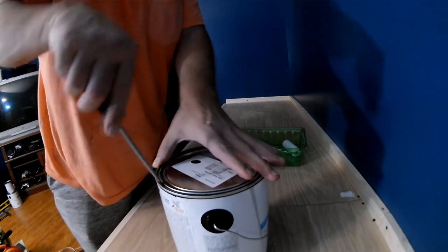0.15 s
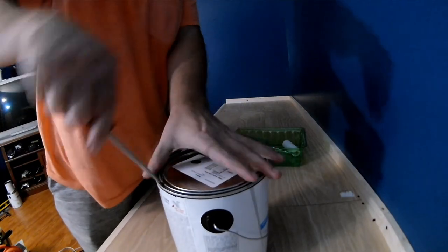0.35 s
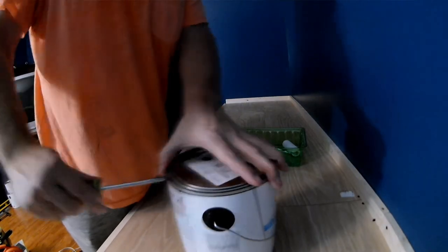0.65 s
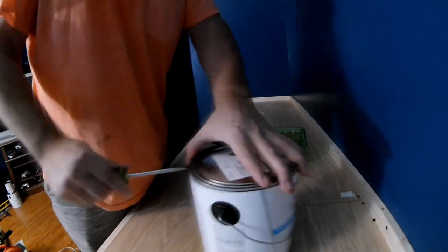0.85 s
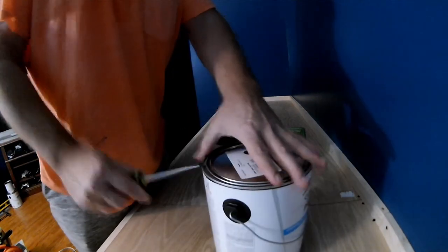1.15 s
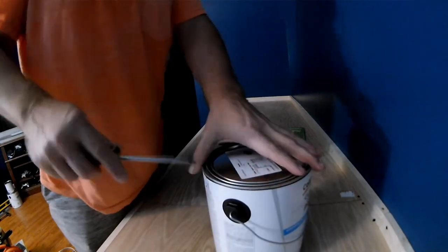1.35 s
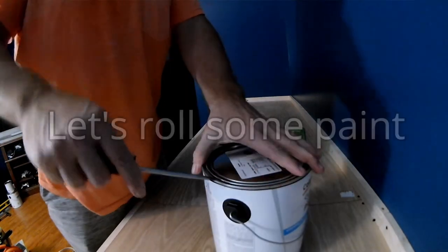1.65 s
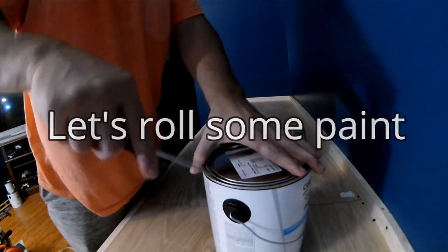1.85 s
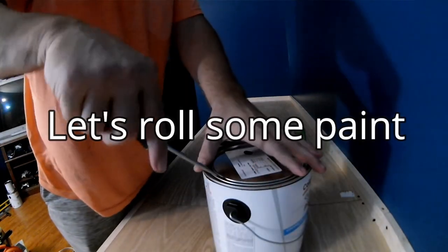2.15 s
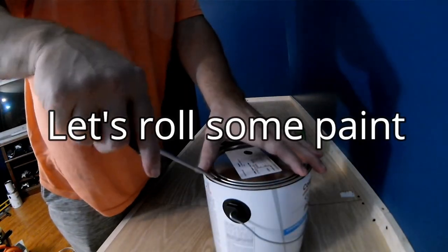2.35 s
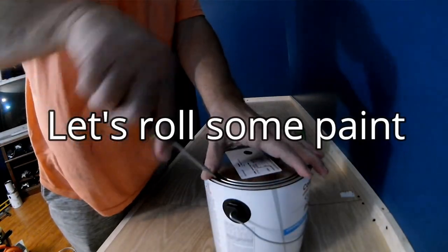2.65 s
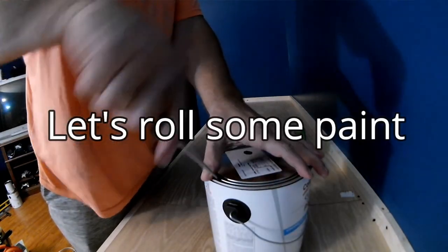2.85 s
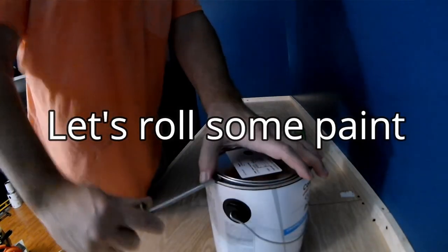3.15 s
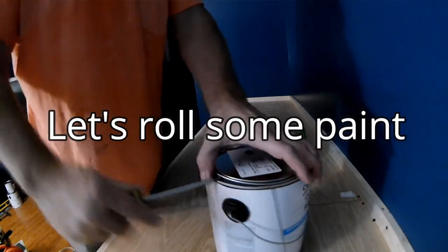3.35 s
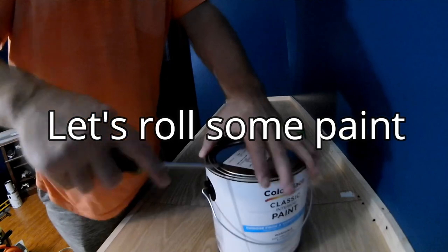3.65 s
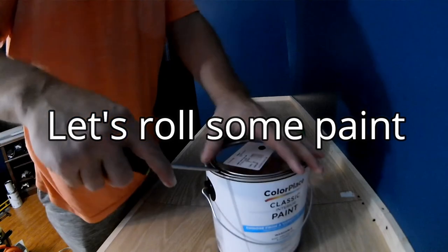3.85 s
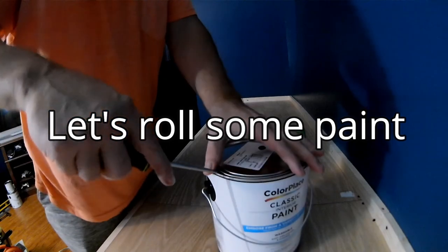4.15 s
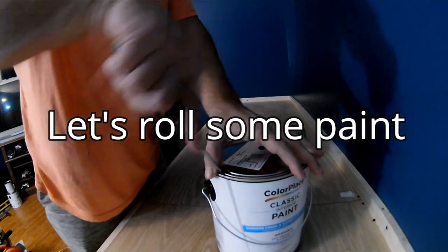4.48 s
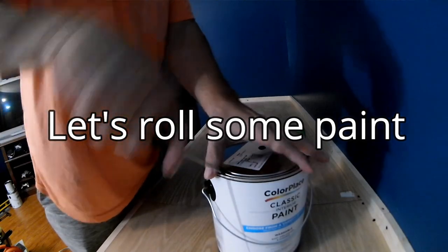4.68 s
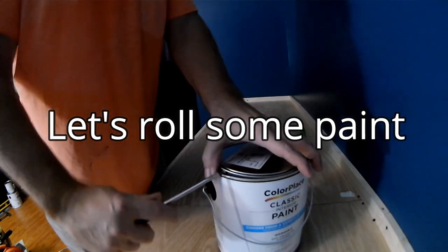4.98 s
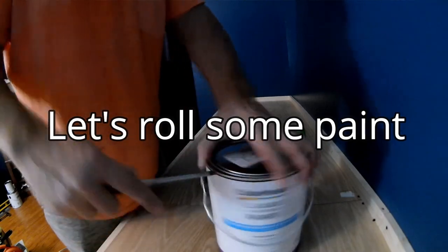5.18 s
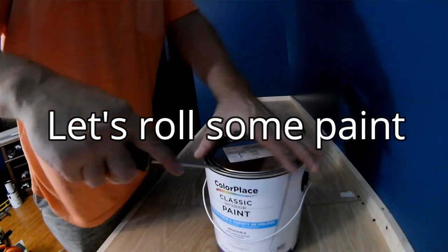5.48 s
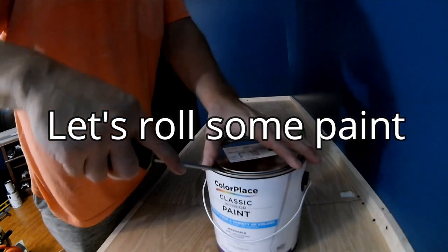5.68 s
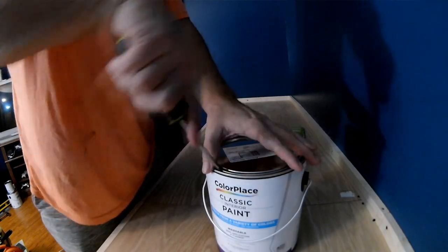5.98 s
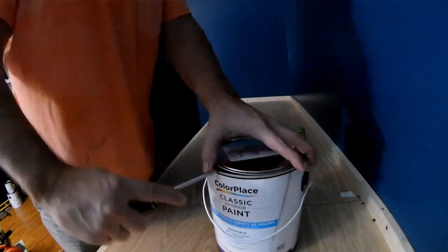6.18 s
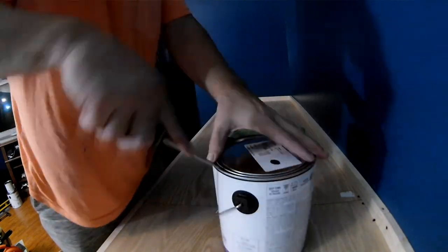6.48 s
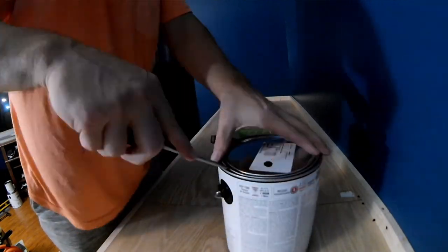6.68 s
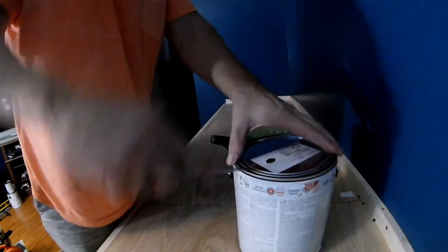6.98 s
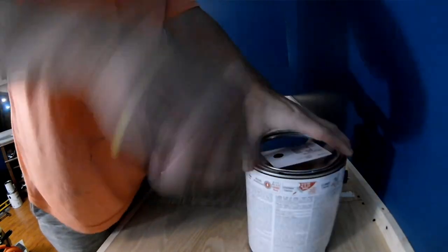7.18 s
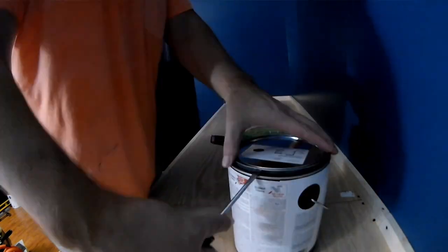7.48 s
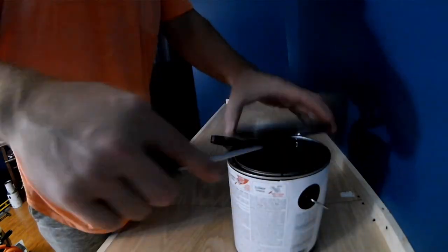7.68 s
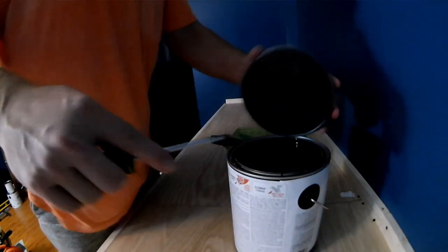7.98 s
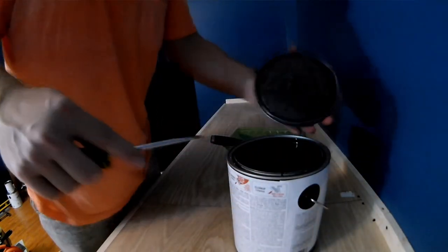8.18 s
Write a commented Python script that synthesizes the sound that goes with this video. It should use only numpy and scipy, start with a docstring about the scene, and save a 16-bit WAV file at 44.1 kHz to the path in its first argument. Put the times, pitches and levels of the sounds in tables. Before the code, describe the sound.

Uneven metallic cracks and hollow clanks on a full steel can, short scraping turns, a burst of fast high ticking over hiss, then room tone.

```python
"""A full steel paint can on a wooden bench in a small, live room has its lid levered up by a screwdriver.
Each knock of the blade is a crack, a rattle of steel and ringing modes; lid snaps add the lid's own ring.
Between tries the can is slid round, made of tiny filtered slips, and it rocks on its base with low swells.
The last tries pass in fast motion, eight times as quick and as high: a chatter of bright ticks over hiss.
A noise-built room tone lies under it all, and is left alone once the fast stretch ends."""
import sys
import numpy as np
from scipy import signal
from scipy.fft import rfft, irfft, next_fast_len
from scipy.io import wavfile
from scipy.ndimage import uniform_filter1d

SR = 44100
rng = np.random.default_rng(int(sys.argv[2]) if len(sys.argv) > 2 else 0)


def unload_wav(signal):
    """Save mono or channel-first audio to the path in sys.argv[1] as 16-bit WAV at rate SR, clipped to [-1, 1]."""
    wavfile.write(
        sys.argv[1],
        SR,
        np.round(np.clip(np.atleast_2d(signal).T, -1, 1) * 32767).astype(np.int16),
    )


N = 367353

FAST_FROM, FAST_TO, SPEED = 6.187, 7.722, 8  # the fast stretch: s, s, times the true pace


def gain_of(db):
    """Decibels to amplitude."""
    return 10 ** (np.asarray(db) / 20)


def evened(x):
    """Scales to unit rms."""
    return x / np.sqrt(np.mean(x ** 2) + 1e-20)


def read(points, hz):
    """Joins (Hz, value) points on a log-frequency axis."""
    f, value = np.transpose(points)
    return np.interp(np.log(hz + 1), np.log(f + 1), value)


def add(mix, s, sound):
    """Mixes a sound in at time s, cut off where the mix ends."""
    part = mix[max(round(s * SR), 0):][:len(sound)]
    part += sound[:len(part)]


def colour(x, points, size=2048):
    """Causal minimum-phase filter with the given (Hz, dB) spectrum: attacks stay sharp."""
    hz = abs(np.fft.fftfreq(size, 1 / SR))
    log_gain = np.log(gain_of(read(points, hz)))
    taps = np.fft.ifft(np.exp(np.conj(signal.hilbert(log_gain)))).real
    return signal.fftconvolve(x, taps[:size // 2])[:len(x)]


# colour of the steady rumble and hiss: pitch_hz, relative_level_db (per Hz)
AIR = [(12, -29.5), (20, -13), (60, -6), (123, -10.5), (158, -14), (172, -16), (216, -19), (241, -15),
       (285, -19.5), (574, -22.5), (1030, -22.5), (2530, -36.5), (5080, -41.5), (14300, -51), (16000, -58)]
AIR_DB = -56.5  # overall level of the rumble and hiss
# steady narrow bands, from low hum to a faint high whine: pitch_hz, width_hz, level_db
HUM = [(26.7, 2.8, -62.5), (118.8, 3.3, -59.5), (202, 10, -80), (1058, 30, -79.5), (13950, 70, -84)]


def room_tone(count):
    """Steady noise shaped into low rumble and hiss, with a hum and a faint high whine."""
    size = next_fast_len(count)
    hz = np.fft.rfftfreq(size, 1 / SR)
    power = (gain_of(AIR_DB) * evened(gain_of(read(AIR, hz)))) ** 2
    for pitch_hz, width_hz, level_db in HUM:
        bump = np.exp(-2 * ((hz - pitch_hz) / width_hz) ** 2)
        power += (gain_of(level_db) * evened(bump)) ** 2
    noise = rfft(rng.standard_normal(size))
    return irfft(noise * np.sqrt(power), size)[:count]


# how long the room holds each pitch: pitch_hz, t60_s
ROOM = [(80, 1), (210, 0.45), (560, 0.76), (1200, 0.46), (2400, 0.6), (6500, 0.46), (9000, 0.3)]


def room_tail(t):
    """Diffuse reflections: noise in which each band dies at its own speed; energy 1."""
    hz, when, z = signal.stft(rng.standard_normal(len(t)), SR, nperseg=256)
    decay = gain_of(-60 * when / read(ROOM, hz)[:, None])
    tail = signal.istft(z * decay, SR)[1][:len(t)]
    return tail / np.linalg.norm(tail)


def ring(t, hz, t60, rise=0.00047):
    """One mode builds up (rise in s) and dies, starting at a random phase."""
    tone = np.sin(2 * np.pi * (hz * t + rng.random()))
    return tone * gain_of(-60 * t / t60) * (1 - np.exp(-t / rise))


# ring of the can, its lid and the bench under it; slides excite it too: pitch_hz, relative_level_db, t60_s
MODES = [(130.54, 0.5, 0.46), (165.7, -3, 0.38), (213.1, -2, 0.31), (281.4, -13, 0.41), (312.3, -5, 0.35),
         (344, -4.5, 0.23), (417.2, -0.5, 0.5), (508.6, 0.5, 0.29), (638, -5.5, 0.24), (768, -2.5, 0.27),
         (823, -5, 0.56), (854.4, -5, 0.07), (926, -5, 0.49), (1053, -28.5, 0.17), (1127, -9.5, 0.67),
         (1118, -5.5, 0.33), (1266, 0.5, 0.13), (1310, -10.5, 0.53), (1360, -21.5, 0.8),
         (2200, -14.5, 0.14), (2312, -37, 0.12)]
# broad colour of the sheet steel, also weighting the modes a blow favours: pitch_hz, gain_db
STEEL = [(15, -53.5), (40, -21), (85, -4), (125, 0.5), (280, 5), (570, 1), (900, 6), (1420, 1.5),
         (1640, -8.5), (2500, -16.5), (2750, -26.5), (3200, -30.5), (6700, -29.5), (8000, -50),
         (11000, -31), (16000, -48.5)]


def can_response(rings_hz, ring_db, rattle_db=-2, rattle_t60=0.078, modes_db=-42, ring_t60=0.33, size=28000):
    """One blow: a crack, a short rattle of steel and near reflections, the modes, and the room."""
    t = np.arange(size) / SR
    grains = rng.standard_normal(size) * (rng.random(size) < 1500 / SR)  # about 1500 grains a second
    rattle = grains * gain_of(-60 * t / rattle_t60)
    spread = gain_of(rattle_db) * rattle / np.linalg.norm(rattle) + room_tail(t)
    spread *= gain_of(0.5)

    skid = rng.standard_normal(size) * np.exp(-t / 0.0029)  # the blade skids for a moment
    bite = (t == 0) + skid / np.linalg.norm(skid)
    crack = colour(bite, [(1500, -5), (3200, 6), (6500, -5), (9000, 0)])  # strongest near 3 kHz

    modes = sum(gain_of(db + 0.58 * rng.standard_normal()) * ring(t, hz, t60) for hz, db, t60 in MODES)
    # modes that this spot excites best
    favoured = sum(gain_of(read(STEEL, hz)) * ring(t, hz, ring_t60) for hz in rings_hz)
    return colour(crack + spread, STEEL) + gain_of(modes_db) * modes + gain_of(ring_db) * favoured


# edges of the bands bench, body, lid, rim and tick: edge_hz
BANDS_HZ = [80, 300, 750, 1800, 7000, 15000]


def band_db(x, span, size=8192):
    """Level in each band over the first span seconds."""
    head = x[:int(span * SR)]
    power = 2 * abs(rfft(head, size)) ** 2 / (size * len(head))
    hz = np.fft.rfftfreq(size, 1 / SR)
    bands = zip(BANDS_HZ, BANDS_HZ[1:])
    return np.array([10 * np.log10(power[(hz >= lo) & (hz < hi)].sum() + 1e-20) for lo, hi in bands])


# dull push on the can wall (hardness 0), one value a band, relative to the blow's strength: level_db
DULL_DB = [0, 1.5, -3, -23, -47]
# sharp snap at the rim (hardness 1), likewise: level_db
SHARP_DB = [-1, -6, 3, -14.5, -39]
GLANCE_DB = 45  # extra tick per unit of hardness beyond 1, as the blade glances off bare steel
DULL_RIM_HZ, SHARP_RIM_HZ, RIM_SCATTER = 1870, 2414, .025  # rim ring; scatter is a fraction of the pitch
RING_DB, HARD_RING_DB = -40, -1  # favoured modes before balancing, and their change per unit of hardness


def knock(strength_db, hardness, bench_db, ring_hz):
    """A harder bite moves the sound from the body up to lid and rim; a downward push booms the bench."""
    levels_db = strength_db + np.add(DULL_DB, hardness * np.subtract(SHARP_DB, DULL_DB))
    levels_db[0] += bench_db
    levels_db[-1] += GLANCE_DB * max(hardness - 1, 0)

    lid_hz = rng.choice([mode[0] for mode in LID])
    detune = 1 + RIM_SCATTER * rng.standard_normal()  # the rim rings a little differently at each spot
    if hardness > .5:
        rings_hz = [ring_hz, lid_hz, SHARP_RIM_HZ * detune]
    else:
        rings_hz = [ring_hz, DULL_RIM_HZ * detune]
    sound = can_response(rings_hz, RING_DB + HARD_RING_DB * hardness)

    centres = np.sqrt(np.multiply(BANDS_HZ[:-1], BANDS_HZ[1:]))
    for _ in range(2):  # balance the bands of the first 30 ms, in two passes
        correction_db = levels_db - band_db(sound, .03)
        sound = colour(sound, list(zip(centres, correction_db)))
    return sound


# colour of the base scraping on wood: pitch_hz, gain_db
SCRAPE = [(35, -19.5), (60, -7), (156, 0), (252, -2), (375, -27.5), (406, -23.5), (467, -7.5), (505, -6),
          (558, -11), (848, -5.5), (1240, -11.5), (3630, -42), (7000, -55), (9100, -82), (15400, -120)]


def slide(length, slips_per_s=900, grain_db=4, uneven_db=2, modes_db=-59):
    """Tiny slips of the base on the wood swell and fade, ringing the can and the room; unit rms."""
    count, t = int(length * SR), np.arange(SR // 2) / SR
    slips = rng.standard_normal(count) * (rng.random(count) < slips_per_s / SR)
    slips *= gain_of(grain_db * rng.standard_normal(count))
    grip = evened(uniform_filter1d(rng.standard_normal(count), size=1200))
    slips *= gain_of(uneven_db * grip)  # the base grips unevenly
    modes = sum(gain_of(db) * ring(t, hz, t60) for hz, db, t60 in MODES)
    body = colour(room_tail(t), SCRAPE) + gain_of(modes_db) * modes
    sound = signal.fftconvolve(slips * signal.windows.tukey(count, .6), body)
    return sound / np.sqrt(np.mean(sound[:count] ** 2))


# the lid's own ring, sprung in its groove; a hard knock favours one: pitch_hz, relative_level_db, t60_s
LID = [(750, -15, .3), (855, -13, 0.17), (923, 1, 0.36), (1104, -9, 0.32), (1278, -14, 0.47),
       (1400, -12, 0.45)]


def lid_song():
    """Sprung free, the lid rings with all its modes."""
    t = np.arange(SR // 2) / SR
    return sum(gain_of(db) * ring(t, hz, t60) for hz, db, t60 in LID)


ROCK_HZ, ROCK_SCATTER = 67.5, 0.064  # rocking pitch; scatter is a fraction of it


def thud(hz, rise=0.051):
    """The full can rocks the bench: two low modes, two octaves apart, swell (rise in s) and die."""
    t = np.arange(SR // 2) / SR
    swell = t / rise * np.exp(1 - t / rise)
    return swell * (np.sin(2 * np.pi * hz * t) + 0.47 * np.sin(2 * np.pi * 0.25 * hz * t))


def microphone(x, low_hz=17):
    """The microphone drops the deepest rumble."""
    return signal.sosfilt(signal.butter(2, low_hz, "high", fs=SR, output="sos"), x)


# Times in these tables are as heard; pitches are at the true pace. # blade on rim and lid, plus small bumps of
# the sliding can at 3.15, 3.398 and 5.16 s: start_s, strength_db, hardness (0 dull, 1 sharp), bench_push_db,
# ring_hz
KNOCKS = [(.136, -47.5, 0.55, 13.5, 640), (.155, -24, -0.12, -2, 638), (.523, -37.5, 1.295, -4.5, 890),
          (.992, -22.5, 1.02, -8.5, 669), (1.122, -22.5, 0.49, 0, 727), (1.599, -38.5, 0.8, -0.5, 933),
          (1.787, -44.5, 0.19, -9, 1040), (1.824, -34, -0.1, -3, 638), (1.902, -23, 1.04, -3, 1140),
          (1.907, -29, 0.72, -0.5, 980), (2.011, -33.5, 0.68, -8, 1012), (2.221, -36.5, -0.23, -1.5, 402.6),
          (2.374, -33.5, 0.51, 2, 912), (2.57, -50, 0.44, 14, 396), (2.602, -29.5, 0.0014, -8.5, 514),
          (2.99, -48.5, -0.065, 2.5, 535), (3.15, -58.5, 0.51, 13, 220), (3.398, -47.5, 0.44, 0, 640),
          (3.817, -38.5, 0.97, -1.5, 1252), (4.147, -28, 0.8, 0, 1243), (4.154, -30.5, 1.08, 2, 794),
          (4.429, -34, 0.36, 1.5, 411), (4.752, -50.5, -0.29, 6.5, 406), (4.894, -47, -0.0089, 1.5, 740),
          (5.16, -45.5, 0.53, 0, 852), (5.579, -41, 0.72, -2, 1249), (5.621, -43, 0.031, -5.5, 340),
          (5.868, -50, 0.19, -1, 403), (5.97, -26, 0.027, -3, 412), (6.2, -46.5, 0.0027, 3, 125),
          (6.2985, -34.5, 0.065, -2.5, 400), (6.3225, -34, -0.23, -0.5, 425), (6.343, -29.5, -0.13, 0, 411),
          (6.392, -36.5, 0.15, 12, 133.4), (6.4915, -30.5, 0.39, -2.5, 420),
          (6.5315, -33.5, -0.35, -0.5, 411), (6.5775, -34.5, 0.0023, -6, 531),
          (6.5915, -39.5, 0.14, 13.5, 124), (6.6805, -28, 0.88, -2, 127.6), (6.7325, -33.5, 0.82, 0, 220),
          (6.7635, -45.5, 0.14, 6.5, 129), (6.805, -43.5, .1, 3.5, 116), (6.828, -41.5, 0.1, 12.5, 125.2),
          (6.9235, -33, 0.37, -2.5, 404), (6.9745, -40, -.1, 6.5, 127), (7.0205, -46.5, -0.59, 8.5, 228),
          (7.1085, -48, 1.1, 11, 117), (7.1495, -36, 1.05, 0, 222), (7.1565, -27.5, 0.73, -3, 129),
          (7.2305, -43.5, .4, 1.5, 163), (7.3205, -28, 0.73, -2, 215), (7.3335, -29, 0.95, -2.5, 166),
          (7.3585, -32, 0.72, -2.5, 400), (7.4265, -33, 0.88, -7, 315), (7.4485, -28.5, 0.51, -5, 350),
          (7.4975, -41, 0.58, -4, 309), (7.5225, -44, 0.66, 10.5, 127), (7.5645, -30, 0.94, -3, 129),
          (7.6055, -33, 0.84, -5.5, 390), (7.6155, -34, 0.76, -5, 308), (7.6575, -36.5, 0.69, -3.5, 352)]
# the can is slid round on the bench: start_s, end_s, level_db
SLIDES = [(0.53, 1.0, -42), (2.91, 3.2, -52.5), (3.35, 3.66, -42), (4.618, 4.87, -60), (5.09, 5.36, -41.5),
          (6.222, 6.273, -43), (6.407, 6.471, -45), (6.618, 6.659, -43), (6.733, 6.766, -45),
          (6.843, 6.896, -46.5), (7.011, 7.043, -42.5), (7.107, 7.128, -49), (7.241, 7.311, -43.5),
          (7.502, 7.558, -48)]
# the lid snaps up a little and sings: start_s, level_db
LID_SNAPS = [(.993, -16.5), (1.123, -20), (1.903, -21), (4.148, -33)]
# the can rocks on its base: start_s, level_db
THUDS = [(1.124, -36), (3.665, -46), (5.39, -53), (5.97, -41), (6.391, -40.5), (6.592, -41.5), (6.83, -39),
         (7.035, -44), (7.12, -44), (7.3, -53)]


def handling(begin, finish, speed):
    """The room, and the can being knocked, slid and rocked in it, over one stretch at its true pace."""
    mix = room_tone(round((finish - begin) * speed * SR))

    def rows(table):
        """Picks the events of the fast stretch, or those before it."""
        return [row for row in table if (row[0] >= FAST_FROM) == (speed > 1)]

    for s, *blow in rows(KNOCKS):
        add(mix, (s - begin) * speed, knock(*blow))
    for start, end, db in rows(SLIDES):
        add(mix, (start - begin) * speed, gain_of(db) * slide((end - start) * speed))
    for s, db in rows(LID_SNAPS):
        add(mix, (s - begin) * speed, gain_of(db) * lid_song())
    for s, db in rows(THUDS):
        rock_hz = ROCK_HZ * (1 + ROCK_SCATTER * rng.standard_normal())  # never quite the same pitch
        add(mix, (s - begin) * speed, gain_of(db) * thud(rock_hz))
    return microphone(mix)


def real_time():
    """The work at its true pace."""
    return handling(0, N / SR, 1)


def fast_motion():
    """The same kind of work over a longer time, played back quickly, so every pitch rises too."""
    return signal.resample_poly(handling(FAST_FROM, FAST_TO, SPEED), 1, SPEED)


def scene():
    """Hard cuts lead into the fast stretch and out of it."""
    t = np.arange(N) / SR
    mix = real_time() * ((t < FAST_FROM) | (t >= FAST_TO))
    add(mix, FAST_FROM, fast_motion())
    return mix[None]


def record(dry):
    """A steep low-pass limits the band to 16.1 kHz."""
    edge = signal.firwin(511, 16100, window=("kaiser", 9), fs=SR)
    return signal.oaconvolve(dry, edge[None], "same")


dry = scene()
out = record(dry)
unload_wav(out)
```